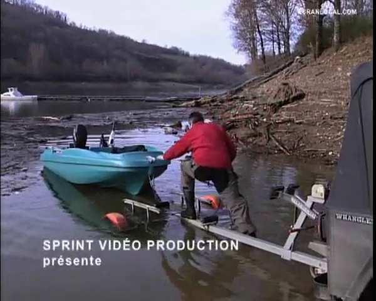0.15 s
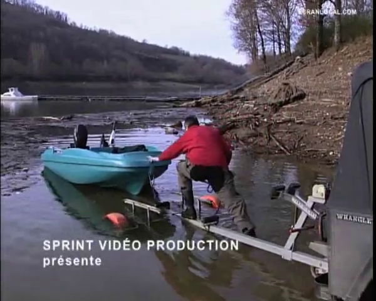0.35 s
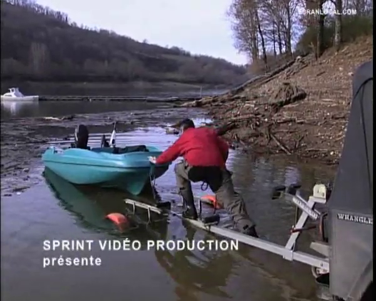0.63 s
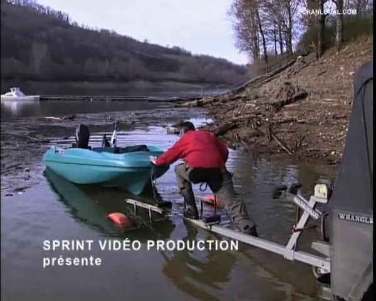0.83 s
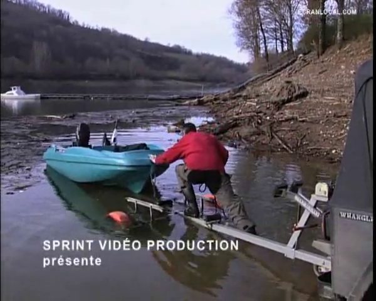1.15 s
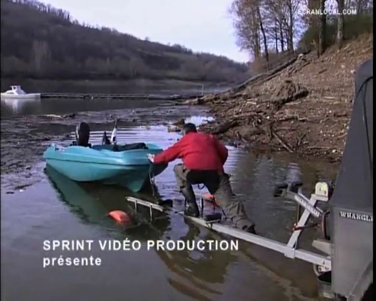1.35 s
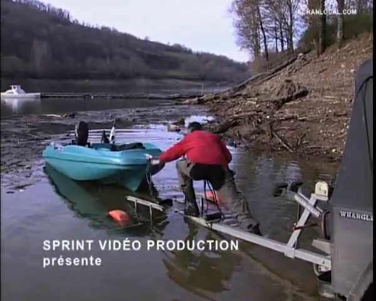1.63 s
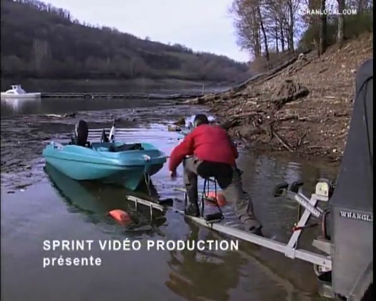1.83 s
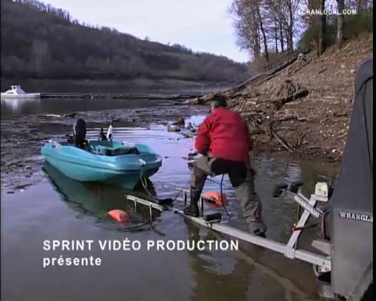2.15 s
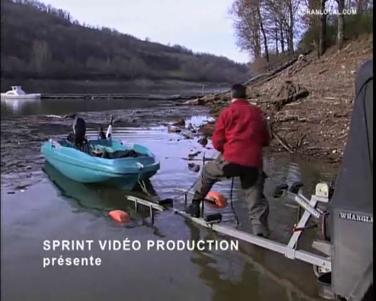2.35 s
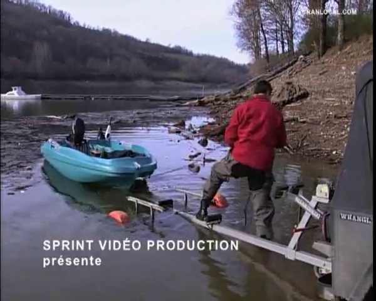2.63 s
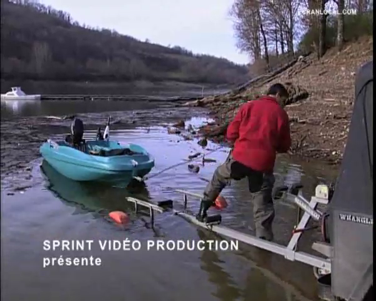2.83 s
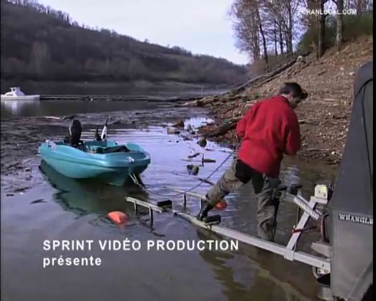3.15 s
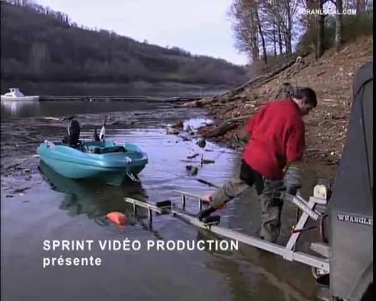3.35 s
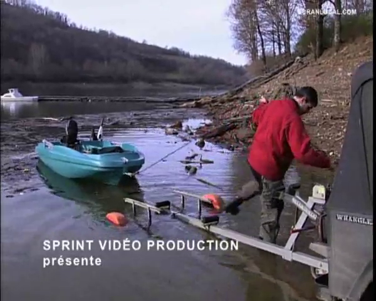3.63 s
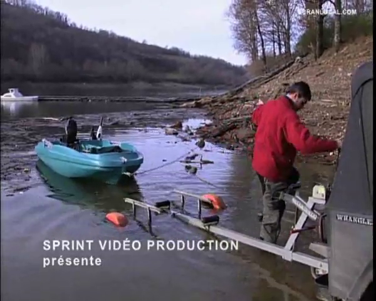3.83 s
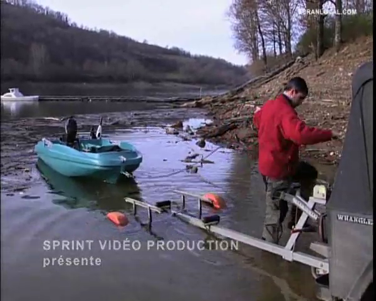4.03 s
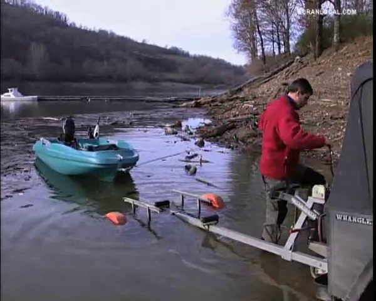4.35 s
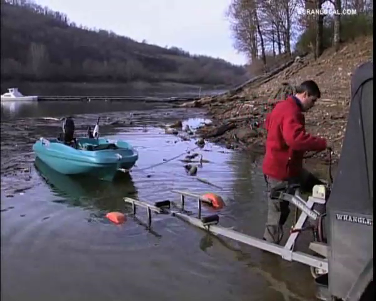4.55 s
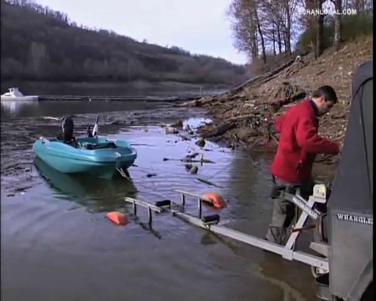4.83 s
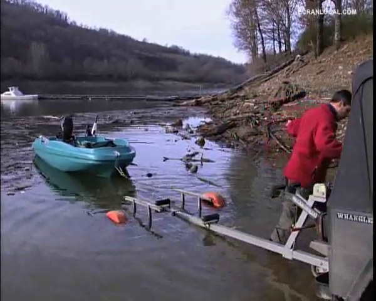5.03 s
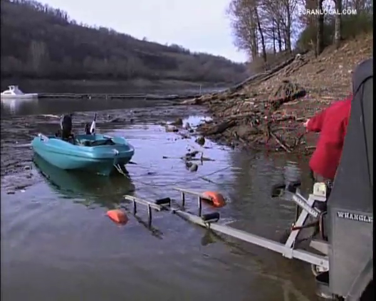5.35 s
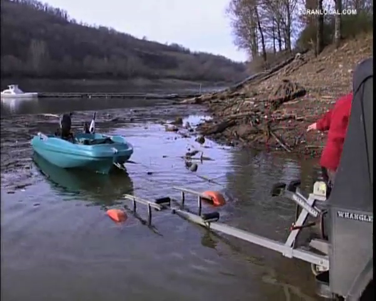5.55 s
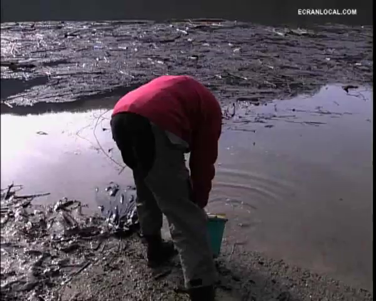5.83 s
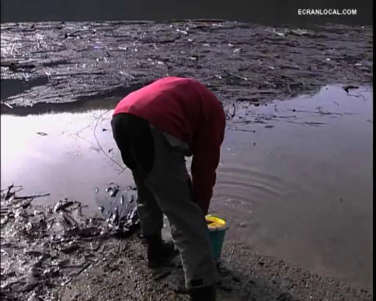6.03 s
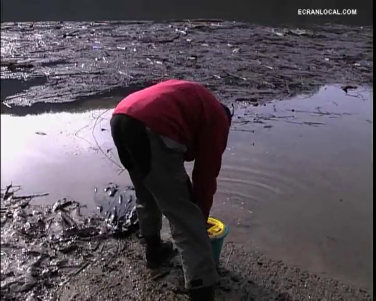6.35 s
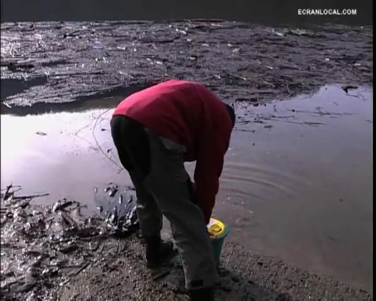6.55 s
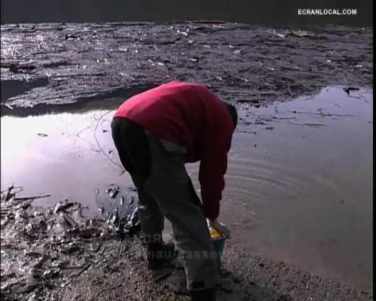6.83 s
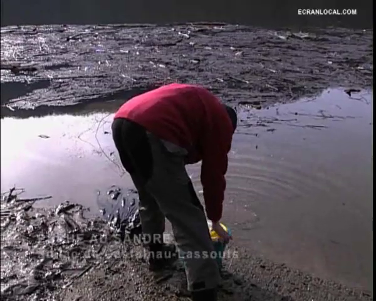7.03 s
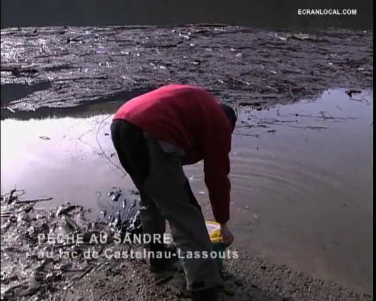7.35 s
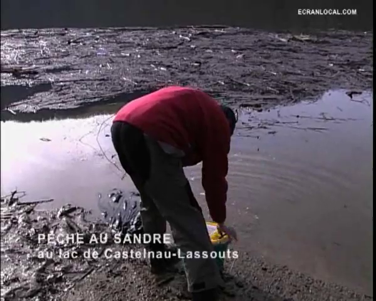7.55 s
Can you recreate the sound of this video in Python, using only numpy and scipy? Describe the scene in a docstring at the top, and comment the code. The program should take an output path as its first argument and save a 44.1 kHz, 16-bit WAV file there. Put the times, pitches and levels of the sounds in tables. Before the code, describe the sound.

An off-road car idles unevenly and fades under wading splashes, then water glugs and a plastic bucket knocks.

```python
"""Idling engine and a bucket by a lake

A four-cylinder off-road car idles unevenly, its puffs of gas ringing the tailpipe, and misfires now
and then. There is one light clink. Someone wades beside the car, stirring up bubbles and spray.
The engine's chugging and hiss fade away. Then water glugs in a plastic bucket, which booms and clacks
as hands rummage in it. Light wind rumbles on the microphone throughout."""
import sys
import numpy as np
from scipy import signal
from scipy.fft import rfft, irfft, next_fast_len
from scipy.io import wavfile
from scipy.ndimage import uniform_filter1d

SR = 44100
rng = np.random.default_rng(int(sys.argv[2]) if len(sys.argv) > 2 else 0)


def unload_audio(sound):
    """Save the sound as a 16-bit wav file, at the path given as the first command line argument."""
    columns = np.transpose(np.atleast_2d(sound))
    # keep every value between -1 and 1, then stretch to whole-number steps
    steps = np.round(np.clip(columns, -1, 1) * 32767)
    wavfile.write(sys.argv[1], SR, steps.astype(np.int16))


N = 339563
T = np.arange(N) / SR

# A TONE table says how strong the low and high pitches are. A ring_s is the time to fade by 60 dB.
# hush of the quiet shore: pitch_hz, level_db
SHORE_TONE = [(12, -39), (20, -1.5), (48, -22), (71, -19), (148, -16.5), (319, -29.5), (365, -25),
              (551, -29), (5000, -44), (12900, -53), (14000, -72)]
# wind on the microphone: pitch_hz, level_db
WIND_TONE = [(12, -37), (33, 1), (50, -10), (120, -21.5), (400, -52)]
# swirls of water and damp bait: peak_s, level_db, rise_s, fall_s
SWIRLS = [(5.65, -50.5, .17, 0.38), (5.97, -55.5, 0.13, 0.054), (6.486, -50, 0.025, 0.014),
          (7.27, -66, 0.049, 0.041), (7.69, -57, 0.18, .1)]
# their wet crackle: pitch_hz, level_db
WET_TONE = [(200, -25), (700, 17), (1300, 10), (2200, 4.5), (3500, 7), (6000, 3.5), (8000, -1.5),
            (11000, -18), (14000, -30)]
# the clink's brief tick (first row), then small splashes: start_s, level_db, pitch_hz, length_s
TICK_AND_SPLASHES = [(1.532, -53, 2280, 0.02), (4.552, -44, 3900, 0.021), (4.576, -44, 3900, 0.023),
                     (4.605, -47, 3900, 0.027), (4.864, -50, 1290, 0.024), (5.649, -45, 1290, 0.019),
                     (5.941, -50, 1080, 0.016), (5.965, -46.5, 3600, 0.016), (6.043, -49.5, 3300, 0.026),
                     (6.079, -57, 4400, 0.028), (6.447, -50, 750, 0.025), (6.477, -37, 700, 0.018)]
# a light clink (first two rows), then plops and drips: start_s, level_db, start_pitch_hz, ring_s
CLINK_AND_PLOPS = [(1.542, -36.5, 2240, 0.028), (1.543, -37, 1050, 0.028), (5.484, -22.5, 760, 0.023),
                   (5.483, -24, 1020, 0.02), (5.519, -18, 294, 0.029), (5.518, -36, 660, 0.028),
                   (5.548, -37, 1260, .025), (5.608, -35.5, 1140, .035), (5.733, -27, 1230, 0.022),
                   (5.736, -36.5, 1500, 0.062), (5.767, -40.5, 2920, .025), (5.839, -41, 4860, .02),
                   (5.938, -45, 1480, 0.029), (5.94, -41, 4080, .02), (5.948, -41, 800, 0.023),
                   (5.967, -42, 677, 0.033), (5.973, -43, 3980, .025), (6.04, -39, 5200, 0.017),
                   (6.25, -49, 760, 0.037), (6.402, -49, 970, .05), (6.418, -44, 760, .035),
                   (7.234, -53, 720, 0.046)]
# glugs in the tilted bucket: start_s, length_s, level_db, start_pitch_hz, wall_share_db
GLUGS = [(6.202, 0.023, -47.5, 284, -14), (6.263, 0.02, -49.5, 292, -4), (6.322, 0.042, -51, 273, -20),
         (6.388, 0.059, -41, 270, -16), (6.45, 0.024, -34, 223, -15), (6.483, 0.045, -27, 206, -18.5),
         (6.543, 0.056, -39, 247, -18)]
# water washing around the bucket: pitch_hz, level_db
WASH_TONE = [(50, -10), (120, 10.5), (340, 1), (800, -17), (1500, -20), (5000, -33), (12000, -65)]
# knocks on the bucket, with the relative strength of each part: start_s, wall_db, boom_db, tick_db
KNOCKS = [(6.386, -49, -53, -52.5), (6.45, -49, -54, -64), (6.48, -39, -39, -52), (6.511, -42, -50, -58),
          (6.622, -59, -63, -64), (6.925, -44.5, -44, -62), (6.948, -39.5, -37, -54.5),
          (7.161, -55, -71, -57), (7.399, -28, -65, -32.5), (7.474, -43, -69, -58),
          (7.489, -34.5, -63, -37), (7.528, -39, -60, -46), (7.548, -35, -47, -39.5),
          (7.559, -42, -39, -58), (7.574, -39.5, -55, -48), (7.594, -39.5, -57, -51),
          (7.617, -45, -62, -63), (7.641, -20, -45, -25.5), (7.651, -35, -41, -52), (7.671, -28, -46, -57)]
# notes of the plastic wall when no hand damps it: pitch_hz, level_db, ring_s
WALL_NOTES = [(616, 4, 0.18), (767, 18.5, 0.035), (856, 11.5, 0.07), (1024, 12, 0.07), (1170, 6, 0.13),
              (1410, 15, 0.024), (1660, 12, 0.046), (2035, 7, 0.096), (2370, -2, 0.031), (2710, 8, 0.05),
              (3380, 2, 0.13), (3840, -8, .08), (4060, -5, 0.12)]
# notes of the air in the bucket, the lowest two close enough to waver: pitch_hz, level_db, ring_s
AIR_NOTES = [(178, -2, 0.1), (205, 1.5, 0.12), (346, -7, 0.063)]
# sharp contact of a knock: pitch_hz, level_db
TICK_TONE = [(400, -62), (1200, -33), (2600, 14), (4200, 6), (6200, -1.5), (8000, -5), (11000, -20),
             (14500, -26)]
# dull crunch of the plastic as it gives: pitch_hz, level_db
CRUNCH_TONE = [(100, -68), (380, -10.5), (680, 0.5), (1000, 3.5), (1700, -2), (3000, -6.5), (5000, -19),
               (12000, -43)]
# idle speed of the engine: time_s, firing_rate_hz
IDLE_SPEED = [(0, 29.65), (0.6, 29.84), (1.7, 29.11), (2.1, 30.17), (2.9, 29.87), (3.25, 30.86),
              (3.75, 29.93), (4.1, 30.36), (5.85, 30.43)]
# rush of the fan, belts and valve gear: pitch_hz, level_db
RUSH_TONE = [(150, 7.5), (390, 4), (560, 0.5), (800, 2), (980, -4.5), (1140, -0.5), (1550, -5), (1950, -9),
             (3250, -12), (3650, -5.5), (4800, -10), (7200, -11), (10000, -18), (14500, -32)]
# clatter of the valves: pitch_hz, level_db
VALVE_TONE = [(300, 8.5), (700, -10), (1300, -27), (2200, -13), (6000, -4.5), (12000, -39)]
# cylinders in firing order, soft and sharp in turn: level_db, early_s, puff_decay_s, push_delay_s
CYLINDERS = [(5.1, 0.00422, 0.0017, 0.01204), (2.6, 0.00379, 0.0012, 0.01067), (5, 0.00418, .0016, 0.0121),
             (0.8, 0.003765, .0011, .0106)]
# uneven firings, most of them weak from burning badly: time_s, level_change_db
MISFIRES = [(.143, -10), (.412, -5), (1.36, -4.5), (1.562, -29), (2.04, -5), (2.17, 1.5), (2.2, -14),
            (2.3, -20), (2.84, -3), (3.27, 0.5), (3.63, -7), (4.16, -17), (5.21, -9), (5.74, -4),
            (5.9, -28)]
# notes of the silencer and tailpipe: pitch_hz, width_hz, level_db, sign (-1 flips the wave)
PIPE_NOTES = [(59.8, 7.8, -5, -1), (82.6, 12, -4.5, 1), (122.8, 9.9, 4.5, -1), (150.4, 7.2, -3, -1),
              (168.3, 29, 2.5, -1), (192.3, 91, 3.5, 1), (228.1, 13.5, 20.5, -1), (304, 9.5, -2, 1),
              (331.5, 11.3, 10.5, -1), (471, 8.5, 5.5, 1), (664, 10, 0, -1), (757, 4.2, 16.5, 1)]


def gain(db):
    """Turn decibels into a number to multiply by."""
    return 10 ** (np.asarray(db) / 20)


def normalise(x, size=N):
    """Scale a sound so its first `size` samples have an average strength (rms) of 1."""
    return x / np.sqrt(np.mean(x[:size] ** 2))


def add(out, start_s, sound):
    """Mix a sound in at the given time."""
    i = int(start_s * SR)
    out[i:i + len(sound)] += sound[:max(N - i, 0)]


def shape_tone(x, tone):
    """Filter a sound so its lows and highs follow a TONE table."""
    size = next_fast_len(len(x) + 8192, True)
    size += size % 2
    hz, db = np.transpose(tone)
    grid_hz = np.maximum(np.arange(size // 2 + 1) * SR / size, 1)
    response = gain(np.interp(np.log(grid_hz), np.log(hz), db))
    # fold the filter in time so it rings only after a sound, never before
    cepstrum = irfft(np.log(response))
    cepstrum[1:size // 2] *= 2
    cepstrum[size // 2 + 1:] = 0
    return irfft(rfft(x, size) * np.exp(rfft(cepstrum)))[:len(x)]


def resonate(x, hz, width_hz):
    """Keep the sound near one pitch; a narrower band rings longer."""
    return signal.lfilter(*signal.iirpeak(hz, hz / width_hz, SR), x)


def wander(rate_hz):
    """A smooth random drift, about 1 in size."""
    hold = int(SR / rate_hz)
    steps = np.repeat(rng.standard_normal(N // hold + 1), hold)
    return normalise(uniform_filter1d(uniform_filter1d(steps, hold), hold)[:N])


def decay(t, ring_s):
    """Die away by 60 dB every ring_s seconds."""
    return gain(-60 * t / ring_s)


def fade_out(start_s, length_s):
    """Hold full level, then fall smoothly to silence."""
    return np.cos(np.pi / 2 * np.clip((T - start_s) / length_s, 0, 1))


def shore_air(hush_db=-58, wind_db=-57, gust_db=3):
    """The open air makes a faint hush, and puffs of wind rumble on the microphone."""
    hush = normalise(shape_tone(rng.standard_normal(N), SHORE_TONE)) * gain(hush_db + wander(3.2))
    wind = normalise(shape_tone(rng.standard_normal(N), WIND_TONE))
    return hush + wind * gain(wind_db + gust_db * wander(2.3))


def stirring(drops_per_s=400, spread_db=3.5, trickle_from_s=3, trickle_db=-76):
    """Tiny drops and crumbs crackle in a faint trickle that swells with every swirl."""
    drops = (rng.random(N) < drops_per_s / SR) * gain(spread_db * np.minimum(rng.exponential(size=N), 4))
    drops *= rng.choice([-1, 1], N)
    t = T[:SR // 50]
    one_drop = rng.standard_normal(len(t)) * decay(t, ring_s=0.013)
    crackle = shape_tone(signal.fftconvolve(drops, one_drop)[:N], WET_TONE)
    flow = gain(trickle_db) * (T > trickle_from_s)
    for peak_s, db, rise_s, fall_s in SWIRLS:
        width_s = np.where(T < peak_s, rise_s, fall_s)
        flow += gain(db) * np.exp(-((T - peak_s) / width_s) ** 2)
    return normalise(crackle) * gain(wander(35)) * flow


def tick_and_splashes(flicker_db=3):
    """Bursts of hiss swell quickly and die away: the clink's tick, then flurries of droplets."""
    out = np.zeros(N)
    for start_s, db, hz, length_s in TICK_AND_SPLASHES:
        age = T[:SR // 3] / length_s
        noise = rng.standard_normal(len(age)) * gain(flicker_db * wander(320)[:len(age)])
        hiss = normalise(resonate(resonate(noise, hz, hz), hz, hz))
        swell = np.minimum(5 * age, 1) * np.exp(-age ** 2)
        add(out, start_s, gain(db) * hiss * swell)
    return out


def boot_bubbles(count=30, span_s=(4.8, 6.02), level_db=-50, spread_db=3, middle_hz=1500, ring_s=0.025):
    """Boots stir up small bubbles, the higher ones fainter. Returns rows like CLINK_AND_PLOPS."""
    rows = []
    for when, strength, pitch in rng.uniform(-1, 1, (count, 3)):
        octaves_up = 1.2 * pitch
        db = level_db + spread_db * (strength - octaves_up)
        rows.append((np.interp(when, [-1, 1], span_s), db, middle_hz * 2 ** octaves_up, ring_s))
    return rows


def clink_and_plops(glide_per_s=3.9, hiss_db=-17):
    """Short rising notes with a little hiss: a light clink, then air pockets ringing in the water."""
    out, t = np.zeros(N), T[:SR // 8]
    for start_s, db, hz, ring_s in CLINK_AND_PLOPS + boot_bubbles():
        hiss = normalise(resonate(rng.standard_normal(len(t)), hz, hz))
        note = np.sin(2 * np.pi * hz * (t + glide_per_s * t ** 2 / 2))
        swell = (1 - np.exp(-t / 0.00019)) * decay(t, ring_s)
        add(out, start_s, gain(db) * (note + gain(hiss_db) * hiss) * swell)
    return out


def glugs(rise_s=0.00067, sag_hz_per_s=450, wobble_hz=11, wobble_db=2.6, wall_hz=665, wash_db=-11):
    """Rocking water makes the bucket's air hum and sag in pitch; the wall and the wash join in."""
    out, t = np.zeros(N), T[:SR // 4]
    for start_s, length_s, db, hz, wall_db in GLUGS:
        pitch_hz = hz - sag_hz_per_s * np.minimum(t, length_s) + wobble_hz * wander(97)[:len(t)]
        hum = np.sin(2 * np.pi * np.cumsum(pitch_hz) / SR) * gain(wobble_db * wander(114)[:len(t)])
        water = rng.standard_normal(len(t))
        wall = normalise(resonate(resonate(water, wall_hz, width_hz=80), wall_hz, width_hz=80))
        wash = normalise(shape_tone(water, WASH_TONE))
        swell = (1 - np.exp(-t / rise_s)) * decay(np.maximum(t - length_s, 0), ring_s=0.051)
        add(out, start_s, gain(db) * swell * (hum + gain(wall_db) * wall + gain(wash_db) * wash))
    return out


def bucket_knocks(wall_trim_db=-4, tick_trim_db=-5, soft_db_per_octave=-6):
    """Each knock ticks, rings and crunches the plastic wall, and makes the air inside boom."""
    out, t = np.zeros(N), T[:SR // 3]
    note_hz, note_db, ring_s = np.transpose(WALL_NOTES)[:, :, None]
    air = sum(gain(db) * np.sin(2 * np.pi * hz * t) * decay(t, air_s) for hz, db, air_s in AIR_NOTES)
    boom = normalise(air * (1 - np.exp(-t / 0.003)), size=1024)
    contact_fade = decay(t, ring_s=0.02) + gain(-19) * decay(t, ring_s=0.13)  # a crack and a faint tail
    for start_s, wall_db, boom_db, tick_db in KNOCKS:
        # a soft push booms more than it rings: it starts slowly, is duller, and the hand damps the wall
        softness = np.clip((boom_db - wall_db + 19.5) / 10, 0, 1)
        rise = 1 - np.exp(-t / (0.0007 + 0.004 * softness))
        tilt_db = soft_db_per_octave * softness
        # the spot that is struck changes how each note answers
        level_luck, pitch_luck = rng.standard_normal((2, len(WALL_NOTES), 1))
        strength = gain(note_db + tilt_db * np.log2(note_hz / 1000) + 2 * level_luck)
        notes = np.sign(pitch_luck) * np.sin(2 * np.pi * note_hz * (1 + 0.016 * pitch_luck) * t)
        ring = np.sum(strength * notes * decay(t, ring_s / (1 + softness)), axis=0)
        contact = rng.standard_normal(len(t)) * rise * contact_fade
        crunch = shape_tone(contact, [(hz, db + tilt_db * np.log2(hz / 1000)) for hz, db in CRUNCH_TONE])
        wall = normalise(ring * rise, size=256) + gain(6 * softness - 1) * normalise(crunch, size=256)
        tick = shape_tone(contact, TICK_TONE)
        add(out, start_s, gain(wall_db + wall_trim_db) * normalise(wall, size=256))
        add(out, start_s, gain(tick_db + tick_trim_db) * normalise(tick, size=1024))
        add(out, start_s, gain(boom_db) * boom)
    return out


def engine_bay(firing_count, throb_db=0.73, belt_db=-16, flicker_db=2.6, clatter_db=-15):
    """The fan's rush throbs with the firings, a belt hisses thinly and the valves clatter softly."""
    throb = gain(throb_db * np.cos(2 * np.pi * firing_count))
    rush = normalise(shape_tone(rng.standard_normal(N), RUSH_TONE)) * throb
    belt = normalise(resonate(rng.standard_normal(N), hz=6560, width_hz=230))
    belt *= gain(flicker_db * wander(35))
    tap_age = (firing_count + 0.11) % 1  # runs from 0 to 1 between valve taps
    taps = rng.standard_normal(N) * np.exp(-tap_age / 0.91) * gain(7.4 * wander(30))
    clatter = normalise(shape_tone(taps, VALVE_TONE))
    return rush + gain(belt_db) * belt + gain(clatter_db) * clatter


def exhaust(firing_count, spread_db=1.44, push_db=-5, drop_s=5.885, drop_db=-5, low_cut_hz=50):
    """Each firing lets out a puff of gas and the piston pushes out the rest; both ring the pipe."""
    firings_s = T[1:][np.diff(np.floor(firing_count)) > 0]
    level_luck, time_luck = rng.standard_normal((len(firings_s), 2)).T
    # the chugs turn suddenly quieter at drop_s
    firing_db = spread_db * level_luck + drop_db * (firings_s > drop_s)
    for time_s, change_db in MISFIRES:
        firing_db[np.argmin(abs(firings_s - time_s))] += change_db
    drift_s = 0.0008 * np.cos(2 * np.pi * (firings_s - 0.12))  # a little late, then early, once a second
    firings_s = firings_s + drift_s + 0.00014 * time_luck
    gas, t = np.zeros(N), T[:SR // 25]
    for k, time_s in enumerate(firings_s):
        cylinder_db, early_s, puff_decay_s, push_delay_s = CYLINDERS[k % len(CYLINDERS)]
        puff = t ** 2 * np.exp(-t / puff_decay_s)
        puff = puff / puff.sum() * gain(firing_db[k] + cylinder_db)
        start_s = max(time_s - early_s, 0)
        add(gas, start_s, puff)
        add(gas, start_s + push_delay_s, gain(push_db) * puff)
    pipe = sum(sign * gain(db) * resonate(gas, hz, width_hz) for hz, width_hz, db, sign in PIPE_NOTES)
    return normalise(signal.sosfilt(signal.butter(2, low_cut_hz, "high", fs=SR, output="sos"), pipe))


def scene(exhaust_db=-28, bay_db=-44.5):
    """Mix the engine, clink, water, bucket and air into one channel."""
    firing_rate_hz = np.interp(T, *np.transpose(IDLE_SPEED))
    firing_count = np.cumsum(firing_rate_hz) / SR - 0.254  # a cylinder fires at each whole number
    pipe = exhaust(firing_count) * gain(exhaust_db) * fade_out(start_s=5.18, length_s=1)
    bay = engine_bay(firing_count) * gain(bay_db) * fade_out(start_s=5.463, length_s=0.69)
    clink_and_water = clink_and_plops() + tick_and_splashes() + stirring() + glugs()
    return (pipe + bay + clink_and_water + bucket_knocks() + shore_air())[None]


def record(dry):
    """Cut away the highest treble, above 14500 Hz."""
    return signal.sosfilt(signal.ellip(10, 0.2, 80, 14500, fs=SR, output="sos"), dry)


dry = scene()
out = record(dry)
unload_audio(out)
```